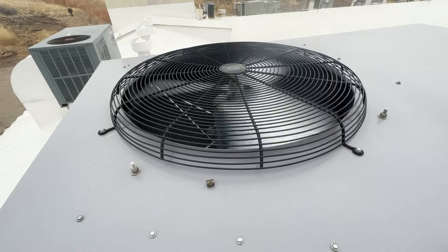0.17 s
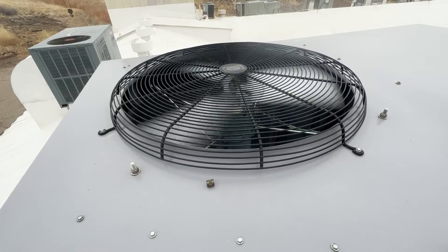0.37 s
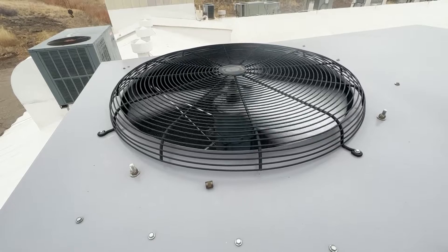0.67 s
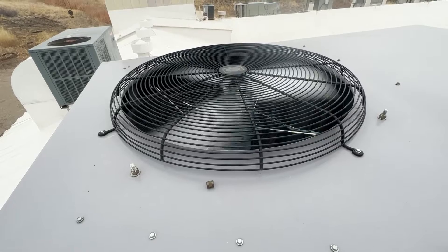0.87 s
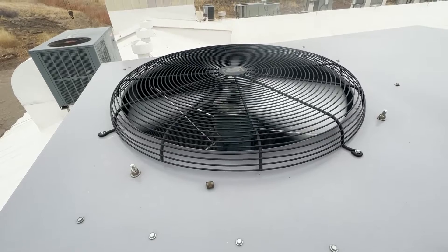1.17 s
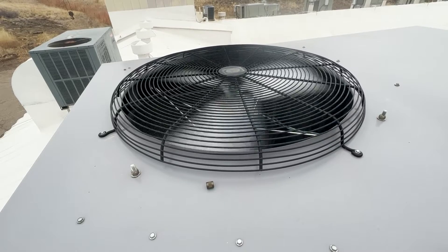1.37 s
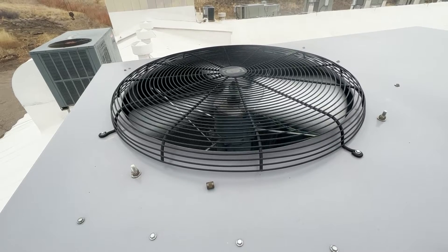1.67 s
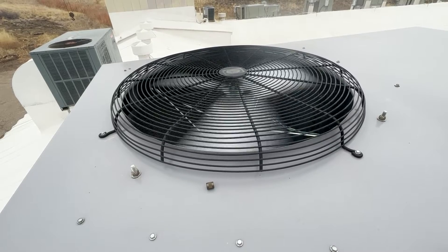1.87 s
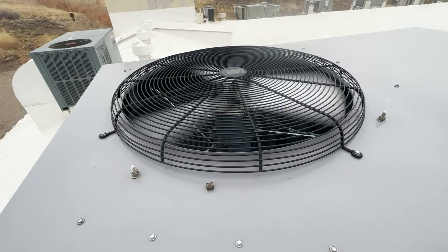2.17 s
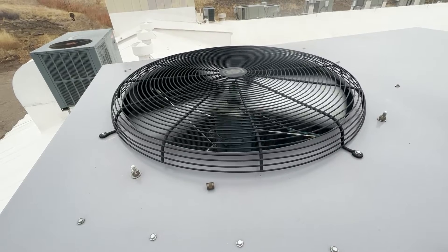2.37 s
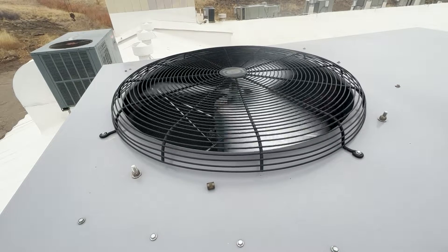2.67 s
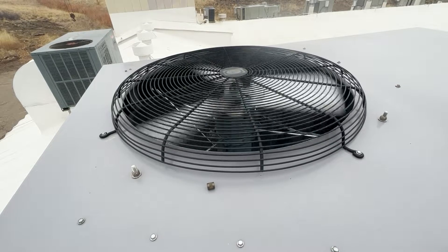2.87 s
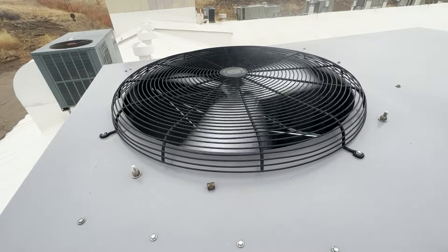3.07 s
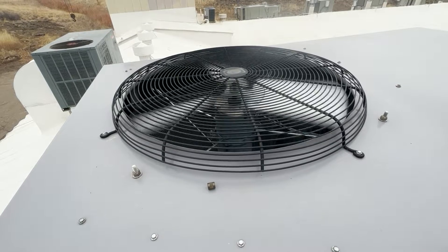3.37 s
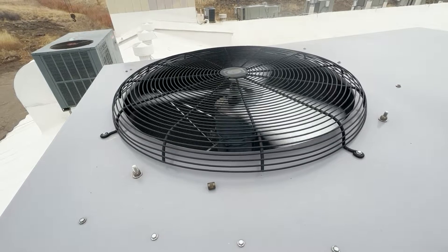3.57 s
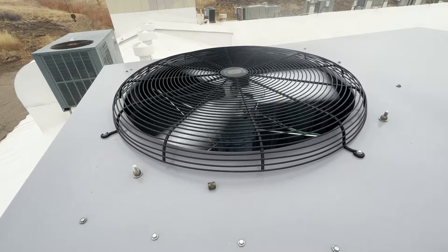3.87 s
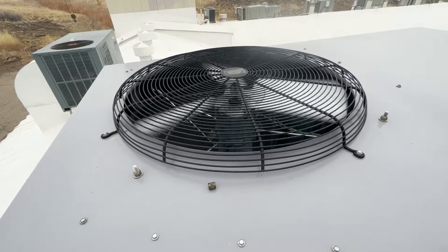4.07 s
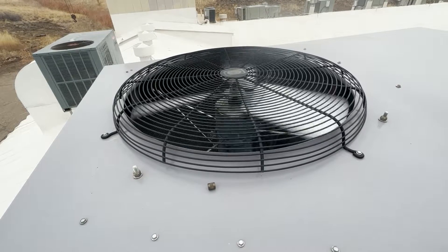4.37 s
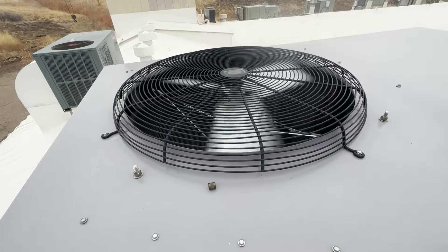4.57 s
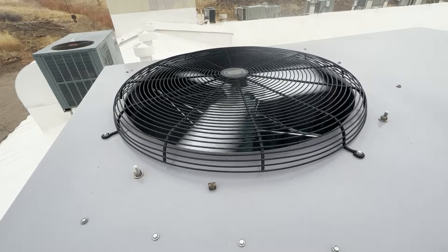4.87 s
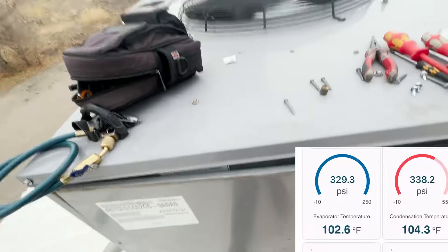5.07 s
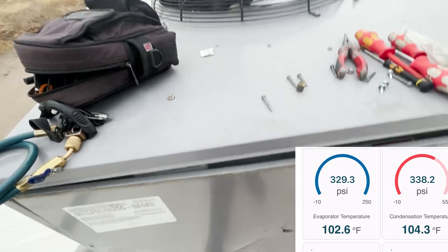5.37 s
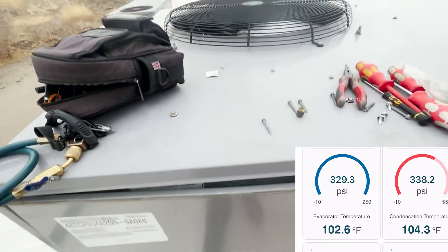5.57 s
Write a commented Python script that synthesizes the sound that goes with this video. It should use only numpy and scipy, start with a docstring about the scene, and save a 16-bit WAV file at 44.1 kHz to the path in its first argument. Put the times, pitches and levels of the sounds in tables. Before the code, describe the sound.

A big rooftop condenser fan thumps and chops loudly, then loses power and winds down in pitch to a faint hum, ending in quieter machine buzz and hiss.

```python
"""A condenser fan on a rooftop unit builds up its thump and chop under power; wind and a few ticks come early.
At 2.2 s the power goes: the blade pass slows, and blade tones and air rush sink with it, over a compressor hum.
Wind buffets return until a short gap at 5.05 s, where the scene changes: beside the unit come compressor buzz,
hiss and scuffs. Blade tones are harmonics of one falling blade-pass phase; chops excite resonances; air is
shaped noise. Every layer is a sum and a difference of two microphone ports, turned into left and right at the
end."""
import sys
import numpy as np
from scipy import signal
from scipy.fft import rfft, irfft, next_fast_len
from scipy.io import wavfile
from scipy.ndimage import uniform_filter1d

SR = 44100
rng = np.random.default_rng(int(sys.argv[2]) if len(sys.argv) > 2 else 0)


def transcribe(u):
    """Save the signal u as a 16-bit wav file named by the first command-line argument.

    u: samples, shape (n,) or (channels, n), limited to [-1, 1]; the rate is SR.
    q: integer samples, one column per channel.
    """
    v = np.clip(np.atleast_2d(u).T, -1, 1)
    q = np.round(v * 32767).astype(np.int16)
    wavfile.write(sys.argv[1], SR, q)


N = 251976
TIME = np.arange(N) / SR
SILENCE_START_S, SILENCE_END_S = 5.047, 5.059

POWER_OFF_S, COAST_S = 2.235, 1.58  # the speed halves COAST_S after power off
# each layer: (relative level dB at full speed, dB lost per dB of speed lost)
THUMP, OCTAVE, HIGHER, CHOPPING, RUSHING = (-12.5, 2.9), (-21, 3.2), (-18, 2.67), (-34.5, 3.14), (1, 3.6)
TWIST_TURNS = .55  # the tones slip by this much while the speed halves: the pressure peak becomes a dip
BITE_DB, BITE_TURNS, BITE_HZ = 1.1, .004, 12  # drift in strength and timing of the blades, and its rate
KNOCK_HZ, KNOCK_DB = 750, -22  # usual colour and relative level of a knock
# blade-pass rate under power: time_s [s], pass_hz [Hz]
BLADE_PASS = [(0, 57.3), (.65, 57.4), (.85, 57.9), (1.5, 57.87), (1.9, 57.8)]
# build-up and wavering of the blade tones about the speed laws:
# time_s [s], thump_db, octave_db, overtones_db, bright_db (extra for bright overtones), chop_db [dB]
TONE_WAVER = [(0, -30, -9, -12.5, 0.5, -5), (.14, -23, -6, -8, 2.5, -3.5), (.25, -16, -6, -4.5, 1.5, 4),
              (.35, -5, -7, -4.5, 3, -3.5), (.39, -8, -19.5, -7.5, -2, 3), (.46, -7, -13, 1, -1.5, 2.5),
              (.57, 0, -9, -1.5, 8, 5.5), (.71, -1, 2.5, 3.5, -2, 5), (.83, -0.5, -3, 2, 2.5, 0),
              (.92, 0, 0.5, -0.5, -2, 2), (1, -1.3, 6, 2, 1.5, 5), (1.2, 0, 0.5, 0, 1.5, 0),
              (1.41, -1, -6, -8, 5.5, -3.5), (1.47, -0.5, 2.5, 1, 0, -0.5), (1.65, 0, 4, -0.5, -2.5, -2),
              (1.83, 1, -1, -5, -1.5, 0), (1.88, 1.5, 7.5, 0, -6.5, -0.5), (1.94, 0.7, -8, -5, 5, 0),
              (2.09, 0.5, -0.5, -3.5, 7, -3), (2.14, 1, -5, -2, -6, -1.5), (2.19, 0.8, -10.5, -7, 5, 0.5),
              (2.28, 0.5, 1.5, 0, -3, -3), (2.32, -4, 3.5, -7.5, -1.5, -1), (2.39, -2.5, 5, 1, 2.5, -11),
              (2.45, 1.5, -4, -3.5, -4, 0.5), (2.62, -1, 4, -2, -2, 0.5), (2.75, -2.5, -6, 7, -4, -2),
              (2.81, -2, 9, 4, -3.5, 4.5), (2.87, -2, 4.5, 1, 3.5, -2), (2.9, -1.5, 3, -5, 1, -7.5),
              (2.97, -7, 7, 5.5, -11.5, 1.5), (3.05, -2.5, 3.5, 3, 2, 0.5), (3.2, -4, 1.5, 2.5, -1, -2),
              (3.45, 2, 1, 3.5, 1, 1.5), (4.2, 1, -3, -2.5, -1, -1)]
# fan sound at the two ports: pitch_hz [Hz], level_db (difference over sum) [dB], lead_rad [rad]
PORT_DIFFERENCE = [(58, -7.8, -.88), (115, -24, .3), (173, -27, 2.6), (231, -20, 2.6), (290, -15.5, 2.2),
                   (350, -8, 1.5), (480, -10.5, 1.55), (784, -3.5, 1.5), (1100, 3, 1.13),
                   (1580, -15.5, 0.5), (2160, -13, -4.5), (2620, 2.5, -2.5), (3000, 3.5, -2),
                   (4300, -4, -0.5), (9000, -18, -1.5)]


def fan():
    """Blade-pass radiation: each layer obeys a power law of speed, and the speed falls by air drag."""
    slowing = 1 + np.maximum(TIME - POWER_OFF_S, 0) / COAST_S
    pass_hz = np.interp(TIME, *np.transpose(BLADE_PASS)) / slowing
    speed_loss_db = 20 * np.log10(slowing)
    thump_db, octave_db, over_db, chop_db, rush_db = (
        db - law * speed_loss_db for db, law in (THUMP, OCTAVE, HIGHER, CHOPPING, RUSHING))
    time_s, *columns = np.transpose(TONE_WAVER)
    low_db, second_db, upper_db, bright_db, flutter_db = (np.interp(TIME, time_s, c) for c in columns)

    turns = np.cumsum(pass_hz) / SR + .92  # counted in blade passes
    twist = np.exp(2j * np.pi * TWIST_TURNS * (slowing - 1))
    bite = wander(BITE_HZ)
    bite_db = BITE_DB * bite.real
    loose_turns = turns + BITE_TURNS * bite.imag

    thump = np.sqrt(2) * (twist * np.exp(2j * np.pi * (turns + .04))).real
    thump *= np.clip(pass_hz / 10 - 2.5, 0, 1)  # a slow blade no longer thumps
    octave_wave = twist * np.exp(4j * np.pi * (turns + .47))
    octave = np.sqrt(2) * ((.95 + .15 * wander(3.)) * octave_wave).real
    higher = overtones(loose_turns, pass_hz, slowing, twist, bright_db)
    air, loose = rush(turns, rush_db)
    puffs, knocks = chops(loose_turns, pass_hz)

    both = amp(thump_db + low_db) * thump + amp(octave_db + second_db) * octave
    both += amp(over_db + upper_db + bite_db) * higher + air
    knock_gain = amp(KNOCK_DB + chop_db - CHOPPING[0])
    both += amp(flutter_db + bite_db) * (amp(chop_db) * puffs + knock_gain * knocks)
    both += hard_chops() + ticks()

    size = next_fast_len(N + 4096)
    bins = np.fft.rfftfreq(size, 1 / SR)
    transfer = amp(read(PORT_DIFFERENCE, bins)) * np.exp(1j * read(PORT_DIFFERENCE, bins, order=2))
    apart = irfft(rfft(both, size) * transfer, size)[:N]
    return np.array([both, apart + loose])


STEADY = 0.965  # steady share, shrinking as a power with each further overtone
LOCK_S = 0.33  # until then the overtones are only loosely tied to the blade pass
DARKEN = 0.2  # exponent by which the overtone colour sinks with the speed
BRIGHT_HZ = 220  # overtones above this count as bright
SWEEP_RAD = 0.11  # the high overtones of a pass come first
# overtones of the blade pass: pitch_hz [Hz], level_db (relative) [dB]
OVERTONE_COLOUR = [(60, 2.5), (115, 3), (173, -2.5), (231, -2), (289, -6.5), (346, -10), (404, -14),
                   (462, -22), (520, -24)]


def overtones(loose_turns, pass_hz, slowing, twist, bright_db):
    """Harmonic series: turbulent inflow makes each overtone swell; together they peak once a pass."""
    over, power = 0, 0
    locked = np.clip(TIME / LOCK_S, 0, 1) ** 2
    for k in range(3, 14):
        gain = amp(read(OVERTONE_COLOUR, k * pass_hz * slowing ** DARKEN))
        share = np.clip(STEADY ** (k - 2) * locked / slowing ** 0.41, 0, 1)
        wave = twist * np.exp(2j * np.pi * k * (loose_turns + .47))
        wave = wave * np.exp(1j * SWEEP_RAD * slowing ** .3 * (k - 4) ** 2)
        brightness = np.clip(2 * np.log2(k * pass_hz / BRIGHT_HZ), 0, 1)
        wave = wave * amp(bright_db * brightness)
        unsteady = np.sqrt(1 - share ** 2) * wander(0.79 * k)
        over = over + gain * ((share + unsteady) * wave).real
        power = power + gain ** 2 / 2
    return over / np.sqrt(power)


# resonances of the shroud: pitch_hz [Hz], width_hz (of one pass of two) [Hz], level_db (relative) [dB]
SHROUD_RESONANCES = [(572, 217, 0), (790, 284, 7.5), (876, 195, 7), (1260, 420, -11.5), (2200, 460, -24.5)]


def shroud(x):
    """Forced resonance: a chop excites steep resonances, summed with alternating sign."""
    total = 0
    for k, (hz, width_hz, db) in enumerate(SHROUD_RESONANCES):
        ringing = resonate(resonate(x, hz, width_hz), hz, width_hz)
        total = total + (-1) ** k * amp(db) * ringing
    return total


def chops(turns, pass_hz):
    """Vortex shedding: each blade sheds a puff (rms 1 overall) and knocks the air once, a little early or late."""
    size, slip, hue = rng.standard_normal((600, 3)).T
    late = turns + .26
    blade = late.astype(int)
    age = (late % 1 - .5) / pass_hz - 0.00033 * slip[blade]  # s since the chop
    puffs = np.exp(-(age / 0.0013) ** 2) * rng.standard_normal(N)
    knocks = np.zeros(N + 240)
    at = np.flatnonzero((age[1:] >= 0) & (age[:-1] < 0))
    hard_s = np.array(HARD_KNOCKS)[:, :1]
    for i in at[abs(at / SR - hard_s).min(0) > .005]:  # the hardest blades knock on their own
        colour_hz = KNOCK_HZ * (1 + 0.092 * hue[blade[i]])
        knocks[i:i + 240] += amp(1.9 * size[blade[i]]) * knock(colour_hz)
    return evened(shroud(puffs + 0.23 * rng.standard_normal(N))), knocks[:N]


# blades that chop hardest: start_s [s], level_db (peak) [dB], pitch_hz [Hz]
HARD_KNOCKS = [(0.249, -13.5, 737), (0.319, -15, 840), (0.458, -12.5, 781), (0.476, -13, 696),
               (0.511, -11.5, 680), (0.529, -11, 725), (0.563, -22, 840), (0.582, -16.5, 750),
               (0.597, -14.5, 854), (0.668, -18.5, 900), (0.702, -14, 723), (0.72, -10.5, 676),
               (0.754, -10.5, 829), (0.772, -12.5, 814), (0.876, -14, 824), (0.912, -14.5, 754),
               (0.979, -18, 719), (0.997, -16, 797), (1.014, -12.5, 876), (1.066, -14, 740),
               (1.134, -17.5, 773), (1.191, -17, 814), (1.463, -18, 641), (1.48, -9, 654),
               (1.602, -15.5, 774), (1.932, -14, 748), (1.951, -21.5, 748), (2.0, -14.5, 832),
               (2.035, -23.5, 689), (2.174, -19, 866), (2.225, -15, 767), (2.332, -15, 824),
               (2.369, -19.5, 697), (2.483, -25, 840), (2.609, -30, 870), (2.811, -16.5, 600),
               (2.883, -29.5, 700), (3.284, -23, 596), (3.341, -25.5, 785), (3.434, -29, 654)]


def hard_chops():
    """Impulsive blade loading: a sudden gust on a blade gives a much harder knock."""
    out = np.zeros(N)
    for start_s, db, hz in HARD_KNOCKS:
        out[round(start_s * SR):][:240] += amp(db) * knock(hz)
    return out


KNOCK_S = .0008  # standard deviation of the bell envelope


def knock(hz):
    """Pressure pulse: a cosine under a bell-shaped envelope, peak near 1."""
    t = np.arange(240) / SR - .002
    return np.exp(-.5 * (t / KNOCK_S) ** 2) * np.cos(2 * np.pi * hz * t)


RUSH_RISE_S, RUSH_START_DB = 0.02, -9  # the rush swells in
TREBLE_HZ, TREBLE_RISE_S = 6000, 0.06  # its treble swells in later
CHOPPED_RUSH = .1  # depth by which the rush swells at each blade
# rush of air: pitch_hz [Hz], sum_db, difference_db (relative densities at the ports) [dB per Hz]
RUSH_SPECTRUM = [(30, -50, -56.5), (85, -47, -56.5), (201, -47.5, -59.5), (345, -51.5, -59.5),
                 (546, -63, -62.5), (896, -58, -64.5), (1050, -73.5, -68.5), (2170, -74.5, -77),
                 (4900, -79, -81.5), (9770, -87.5, -87), (10770, -125, -99.5), (11500, -120, -90.5),
                 (12000, -95.5, -110), (14300, -99, -125), (15000, -102, -101)]
# duct and microphone colour, shared with the roof noise: pitch_hz [Hz], width_hz [Hz], level_db [dB]
DUCT_COLOUR = [(1248, 112, 8), (1755, 110, 4.5), (2445, 440, 3.5), (4870, 150, 2.5), (5380, 91, -10),
               (7650, 310, -8), (7870, 190, 5.5)]


def rush(turns, rush_db):
    """Turbulent broadband noise: its sum is modulated at the blade pass, its difference is not."""
    level = amp(rush_db + RUSH_START_DB * np.exp(-TIME / RUSH_RISE_S))
    pair = noise(RUSH_SPECTRUM, patchy_db=1., flicker_db=0.33, peaks=DUCT_COLOUR) * level
    treble = signal.sosfilt(signal.butter(2, TREBLE_HZ, "high", fs=SR, output="sos"), pair)
    air, loose = pair - treble * np.exp(-(TIME / TREBLE_RISE_S) ** 2)
    swell = np.cos(np.pi * (turns - .24)) ** 6 * 2 - .6
    return air * (1 + CHOPPED_RUSH * swell), loose


TICK_HZ, TICK_WIDTH_HZ, TICK_S = 3000, 2000, .0015  # colour, width of each pass, decay time
# small dry ticks: start_s [s], level_db (peak) [dB]
DRY_TICKS = [(0.055, -34), (.087, -24.5), (0.11, -25)]


def ticks():
    """Damped transients: decaying noise through a broad resonance, taken twice."""
    out = np.zeros(N)
    t = np.arange(600) / SR
    for start_s, db in DRY_TICKS:
        grit = rng.standard_normal(600) * np.exp(-t / TICK_S)
        tick = resonate(resonate(grit, TICK_HZ, TICK_WIDTH_HZ), TICK_HZ, TICK_WIDTH_HZ)
        out[round(start_s * SR):][:600] += amp(db) * tick / abs(tick).max()
    return out


SHAFT_HZ = 57.6
HISS_DB, BODY_HZ, BODY_SWELL_S = 0.6, (240, 900), 0.11  # the low middle of the hiss swells in
# compressor lines close by, and a mains hum line near 479 Hz: pitch_hz [Hz], level_db (relative) [dB]
CLOSE_LINES = [(59.2, -41), (118.4, -45.5), (479.1, -48.5), (646.0, -65), (818.3, -57.5), (888.2, -57.5),
               (1055, -60), (1114, -60), (1168, -57.5), (1233, -59), (1292, -53.5), (1518, -58),
               (1696, -61), (1760, -57.5)]
# weaker multiples of the shaft speed: pitch_hz [Hz], level_db (relative) [dB]
SHAFT_COMB = [(150, -46), (400, -82), (2000, -78), (3000, -72), (3300, -79), (5900, -82), (6200, -72.5),
              (8500, -76), (10000, -87)]
# hiss: pitch_hz [Hz], sum_db, difference_db (relative densities at the ports) [dB per Hz]
HISS_SPECTRUM = [(30.05, -76, -87), (55, -61, -86), (89, -59.5, -88), (170, -64, -80), (240, -73.5, -73),
                 (372, -74, -72), (700, -81, -71.5), (1200, -82, -77), (1800, -82.5, -99), (2850, -85, -81),
                 (3180, -91, -89), (5900, -93.5, -94), (6300, -89, -97), (8750, -94.5, -95),
                 (10300, -102, -104), (11000, -120, -113)]
# scuffs and low bumps: centre_s [s], length_s [s], level_db (relative) [dB], pitch_hz [Hz], width_hz [Hz]
SCUFF_BURSTS = [(5.076, 0.025, -27, 66.7, 30), (5.162, 0.05, -34.5, 60, 25), (5.325, 0.022, -35, 130, 120),
                (5.11, 0.04, -54, 1300, 900), (5.202, 0.07, -47.5, 1800, 900),
                (5.29, 0.047, -47, 1100, 700), (5.432, 0.05, -43.5, 635, 40),
                (5.658, 0.054, -48, 850, 300.1)]


def beside():
    """Rotating-machine spectrum close by: lines, a comb of shaft multiples, hiss and scuffs to the side."""
    multiples = SHAFT_HZ * np.arange(3, 170)
    level = amp(read(SHAFT_COMB, multiples) + 3.0 * rng.standard_normal(len(multiples)))
    start = round(SILENCE_START_S * SR)
    shaft_s = TIME[start:] + 2.e-5 * wander(2.)[start:].real  # slight timing drift
    comb = np.zeros((2, N))
    for channel in comb:
        phase = 2 * np.pi * rng.random((len(multiples), 1))
        channel[start:] = level @ np.cos(2 * np.pi * multiples[:, None] * shaft_s + phase)

    since_s = TIME - SILENCE_END_S
    hiss = noise(HISS_SPECTRUM, patchy_db=1.4, flicker_db=.8) * amp(HISS_DB)
    body = signal.sosfilt(signal.butter(2, BODY_HZ, "band", fs=SR, output="sos"), hiss)
    hiss = hiss - body * np.clip(1 - since_s / BODY_SWELL_S, 0, .8)

    scuffs = np.zeros((2, N))
    for centre_s, length_s, db, hz, width_hz in SCUFF_BURSTS:
        side = np.clip(hz / 600, .2, 1.6)  # higher scuffs sit further to one side
        scuffs += amp(db) * burst(centre_s, length_s, hz, width_hz) * np.array([[1], [side]])
    buzz = tones(CLOSE_LINES, waver=.36) * np.clip(since_s / 0.039, 0, 1)
    return buzz + comb * [[1.4], [.8]] + hiss + 0.55 * scuffs


SWING, LUMPY = 1.6, .35  # gains of the smooth swing of pressure and of its low noise
# wind buffets, each centred on a dip of pressure:
# centre_s [s], length_s [s], level_db (relative) [dB], pitch_hz [Hz], pan_db (left minus right) [dB]
WIND_BUFFETS = [(0.022, 0.033, -28, 128, 0), (0.056, 0.017, -20, 119, 0), (0.098, 0.022, -14, 60, 2),
                (0.119, 0.02, -11, 62, -1), (0.138, 0.022, -7, 52, -1), (0.155, 0.022, -21, 55, 0),
                (0.178, 0.022, -8, 59, 5), (0.194, 0.02, -20, 202, 21), (0.21, .014, -14, 110, -4),
                (0.232, 0.023, -15.5, 75, -7), (.243, .022, -17.5, 240, 1), (0.255, 0.022, -12, 100, 7),
                (0.297, 0.08, -20.5, 281, 5), (.322, 0.022, -18.5, 155, 4), (3.799, 0.094, -33, 71.3, 23),
                (4.83, 0.046, -23.5, 61.6, -8), (4.879, 0.02, -29, 172, -2), (4.93, 0.07, -25.5, 70, 1),
                (4.981, 0.053, -29, 58, 10), (4.996, 0.014, -34, 295, 10), (5.014, 0.011, -29.5, 230, 14),
                (5.033, 0.034, -20.5, 74, 10), (5.043, .015, -27, 75, 8), (5.031, 0.016, -21, 183, 17),
                (5.034, 0.015, -33, 367, 4)]


def wind():
    """Turbulent pressure at the ports: a few shared swings, with low noise unrelated between them."""
    out = np.zeros((2, N))
    for centre_s, length_s, db, hz, pan_db in WIND_BUFFETS:
        t = TIME - centre_s
        swing = np.exp(-.5 * (t / (0.25 * length_s)) ** 2) * -np.cos(2 * np.pi * hz * t)
        left, right = (
            amp(db + side * pan_db / 2) * (SWING * swing + LUMPY * burst(centre_s, length_s, hz, 0.72 * hz))
            for side in (1, -1))
        out += [(left + right) / 2, (left - right) / 2]
    return out


# compressor hum from above: time_s [s], pitch_hz [Hz], level_db (rms in the sum) [dB]
HUM_GLIDE = [(0, 59, -36.5), (2.6, 57.4, -30), (3.5, 57.25, -28), (3.9, 59.2, -28), (4.3, 58.8, -30),
             (4.65, 58.3, -33), (4.85, 59.4, -36), (5.05, 60.3, -35)]
# steady lines from above: pitch_hz [Hz], level_db (relative) [dB]
STEADY_LINES = [(118, -42), (360.7, -53), (479.5, -51.5), (764.4, -61.5), (823.6, -62), (884, -64),
                (1523, -66), (1707, -65.5)]
# far machines: pitch_hz [Hz], sum_db, difference_db (relative densities at the ports) [dB per Hz]
ROOF_SPECTRUM = [(35, -53, -65), (70, -58.5, -73.5), (100, -60, -75.5), (206, -65.5, -75.5),
                 (550, -79.5, -76.5), (880, -83, -84), (1290, -93, -89.5), (2600, -89.5, -88.5),
                 (5900, -95, -97), (9800, -105, -103), (10700, -125, -104), (12200, -117, -114),
                 (12600, -109, -125), (14300, -112, -125), (15000, -113, -113)]


def roof():
    """Tonal and broadband background: compressor hum, steady lines and far machines heard from above."""
    time_s, hz, db = np.transpose(HUM_GLIDE)
    hum_turns = np.cumsum(np.interp(TIME, time_s, hz)) / SR
    hum = amp(np.interp(TIME, time_s, db)) * np.sqrt(2) * np.exp(2j * np.pi * hum_turns)
    far = noise(ROOF_SPECTRUM, patchy_db=.7, flicker_db=.3, peaks=DUCT_COLOUR)
    hum_pair = (hum * [[1], [-.2 * np.exp(1j * .45)]]).real
    return hum_pair + tones(STEADY_LINES, waver=0.46) + far


def burst(centre_s, length_s, hz, width_hz):
    """Resonant noise burst: noise of rms 1 in one steep resonance under a bell-shaped envelope."""
    out = np.zeros(N)
    near = abs(TIME - centre_s) < .25 + 3 * length_s
    grit = rng.standard_normal(near.sum())
    out[near] = evened(resonate(resonate(grit, hz, width_hz), hz, width_hz))
    return out * np.exp(-.5 * ((TIME - centre_s) / (0.81 * length_s)) ** 2)


def tones(lines, waver):
    """Amplitude and phase modulation: lines that waver a little, with their own phase in sum and difference."""
    out = np.zeros((2, N))
    for hz, db in lines:
        wave = amp(db) * (1 + waver * wander(9.1)) * np.exp(2j * np.pi * hz * TIME)
        phase = np.exp(2j * np.pi * rng.random((2, 1)))
        out += (wave * phase).real * [[np.sqrt(2)], [.8]]
    return out


def noise(spectrum, patchy_db, flicker_db, peaks=()):
    """Short-time spectral synthesis: random sum and difference spectra with drifting patches."""
    frames, hz = N // 256 + 5, np.fft.rfftfreq(1024, 1 / SR)
    a, b, c, d, patches = rng.standard_normal((frames, 513, 5)).T
    # drawn as (frequency, frame) and smoothed along both
    patches = evened(uniform_filter1d(uniform_filter1d(patches, size=14, axis=0), size=10, axis=1))
    flicker = evened(uniform_filter1d(rng.standard_normal(frames), size=3))
    colour = np.array([read(spectrum, hz, order=1), read(spectrum, hz, order=2)])
    colour = colour + sum(db * np.exp(-((hz - f) / width) ** 2) for f, width, db in peaks)
    gain = amp(colour[:, :, None] + patchy_db * patches + flicker_db * flicker)
    z = np.array([a + 1j * b, c + 1j * d]) * gain
    return signal.istft(z, nperseg=1024, noverlap=768)[1][:, :N] * np.sqrt(SR / 1024 * 1.5)


def resonate(x, hz, width_hz):
    """Second-order resonance: a fixed peak of gain 1."""
    return signal.lfilter(*signal.iirpeak(hz, hz / width_hz, SR), x)


def wander(hz):
    """Low-passed random process: slow complex chance, rms about 1."""
    steps = np.arange(int(N / SR * 60) + 40) / 60  # 60 steps a second
    a, b = rng.standard_normal((len(steps), 2)).T
    slow = evened(signal.lfilter([1], [1, -np.exp(-2 * np.pi * hz / 60)], a + 1j * b))
    real = np.interp(TIME + .3, steps, slow.real)
    return real + 1j * np.interp(TIME + .3, steps, slow.imag)


def read(points, hz, order=1):
    """Logarithmic pitch scale: one column of a spectrum, interpolated over log frequency."""
    table = np.transpose(points)
    return np.interp(np.log(hz + 1), np.log(table[0] + 1), table[order])


def evened(x):
    """Root-mean-square normalization: scales to rms 1."""
    return x / np.sqrt(np.mean(abs(x) ** 2) + 1e-20)


def amp(db):
    """Level to pressure ratio: decibels to gain."""
    return 10 ** (np.asarray(db) / 20)


LOW_CUT_HZ = 48


def scene():
    """Superposition: above the fan, a moment of silence, then beside the unit; sum and difference to stereo."""
    # the microphones lose the deepest bass
    low_cut = signal.butter(4, LOW_CUT_HZ, "high", fs=SR, output="sos")
    fade_out = np.clip((SILENCE_START_S - TIME) / 0.0013, 0, 1)
    fade_in = np.clip((TIME - SILENCE_END_S) / 0.0024, 0, 1)
    above = signal.sosfilt(low_cut, fan() + roof()) + signal.sosfiltfilt(low_cut, wind())
    both, apart = fade_out * above + fade_in * beside()
    return np.array([both + apart, both - apart])


EDGE_HZ = 15700


def record(dry):
    """Saturation and band limit: soft overload of the loudest peaks, then a steep low-pass."""
    soft = 1.1 * np.tanh(dry / 1.05)
    low_pass = signal.firwin(2047, EDGE_HZ, window=("kaiser", 9), fs=SR)
    return signal.oaconvolve(soft, low_pass[None], "same")


dry = scene()
out = record(dry)
transcribe(out)
```